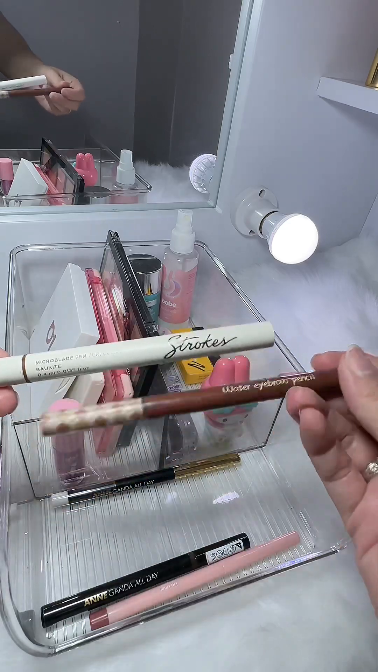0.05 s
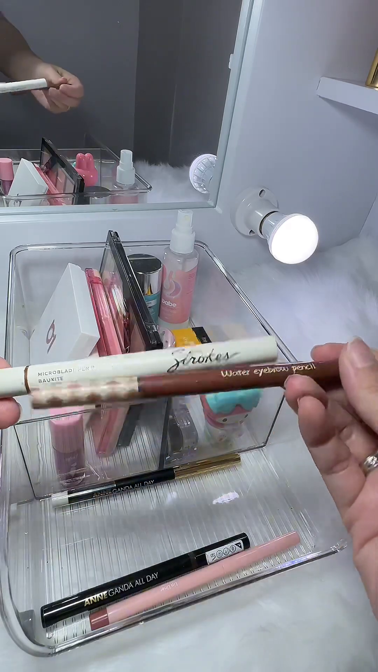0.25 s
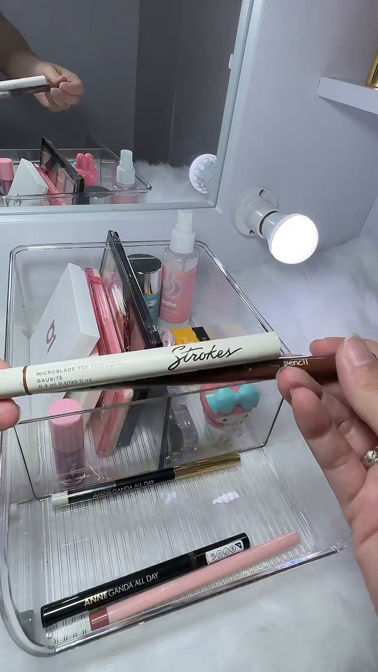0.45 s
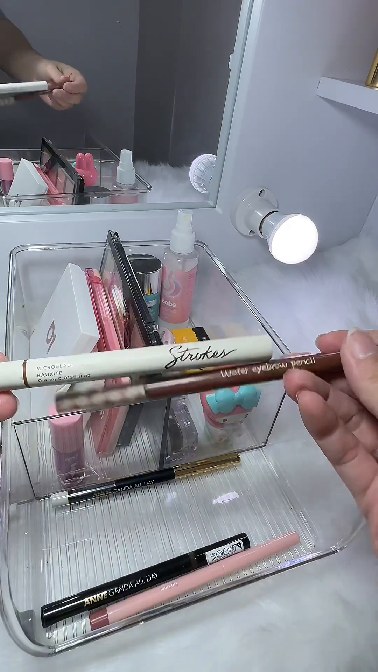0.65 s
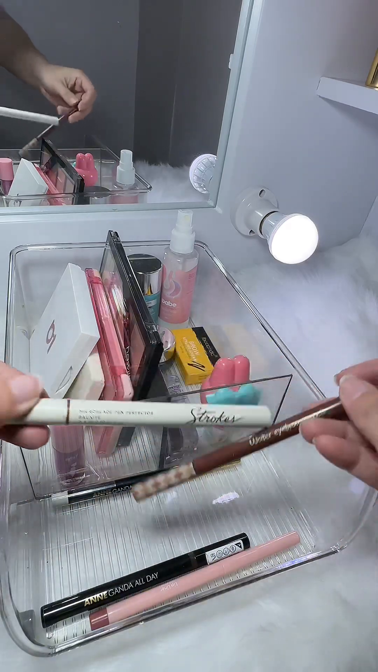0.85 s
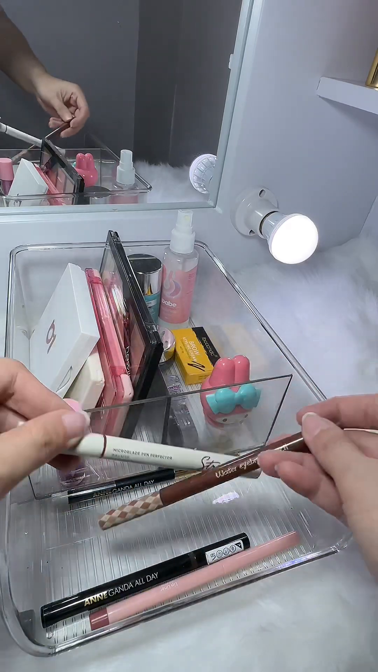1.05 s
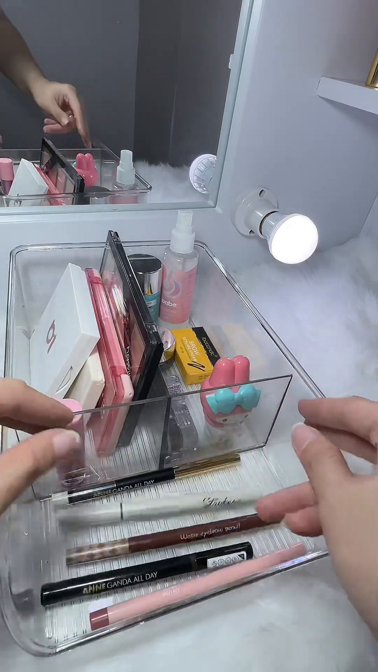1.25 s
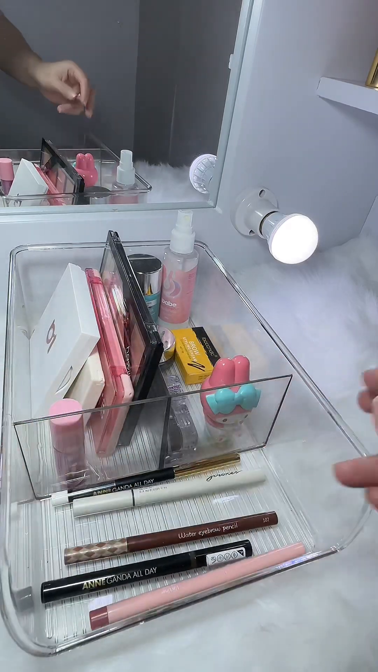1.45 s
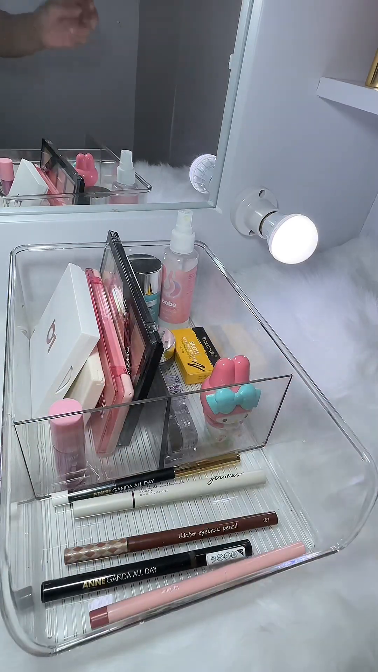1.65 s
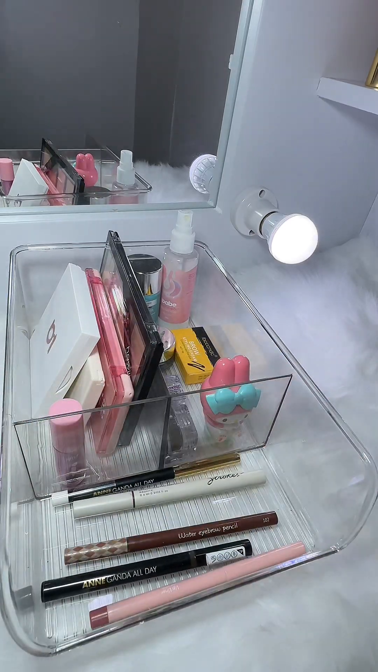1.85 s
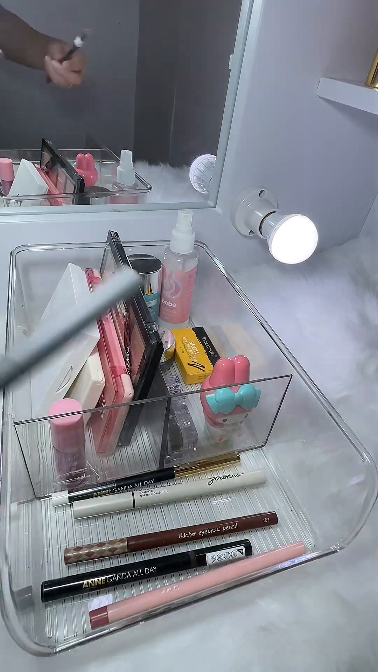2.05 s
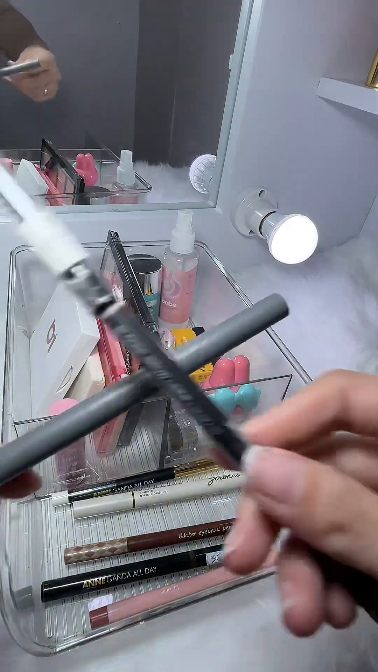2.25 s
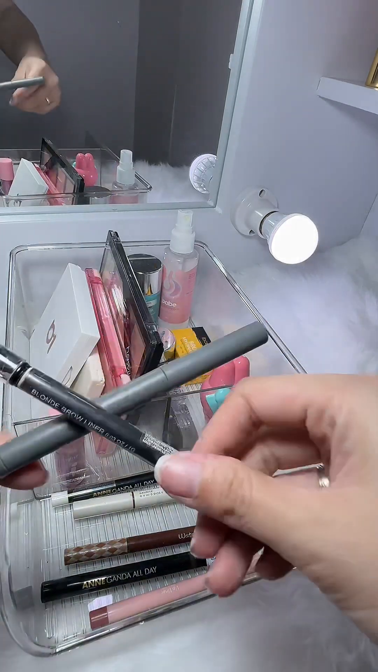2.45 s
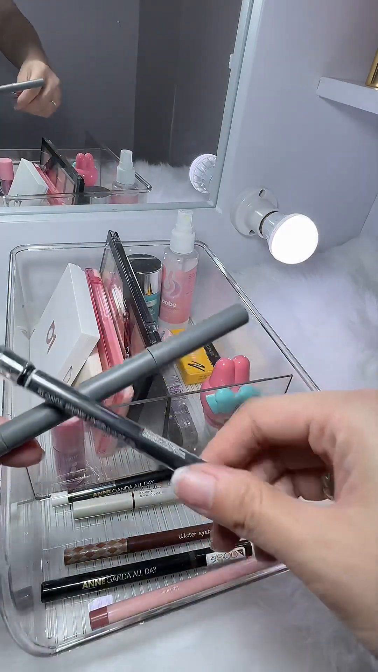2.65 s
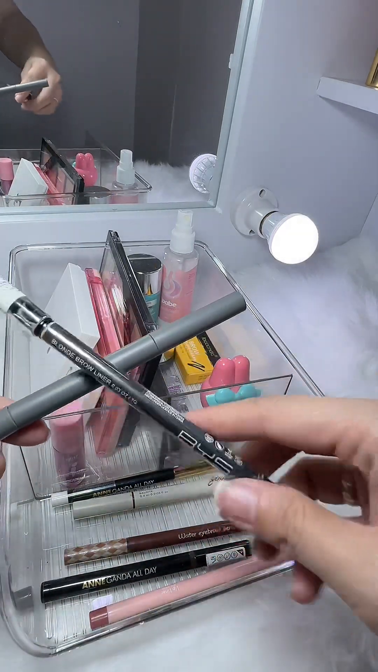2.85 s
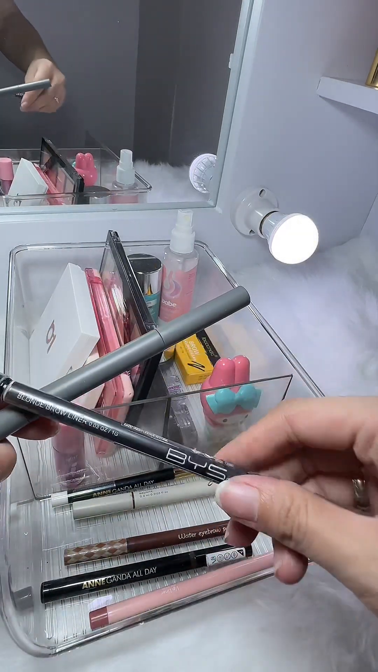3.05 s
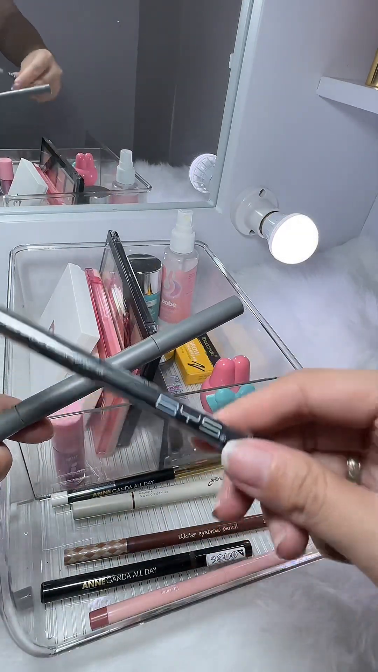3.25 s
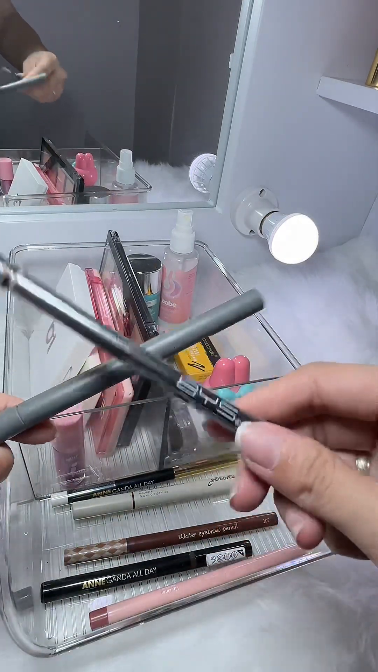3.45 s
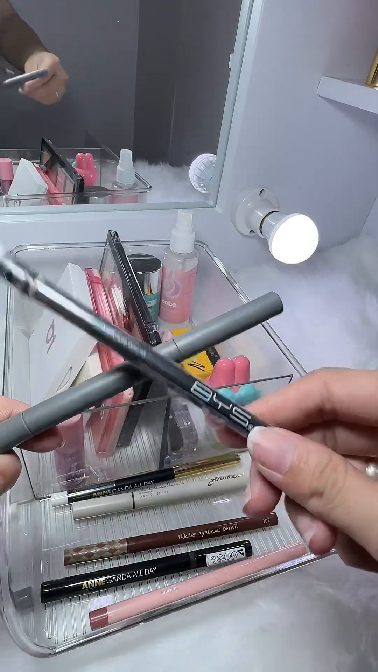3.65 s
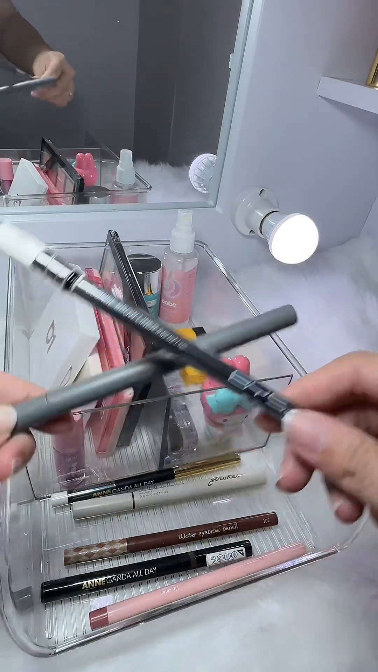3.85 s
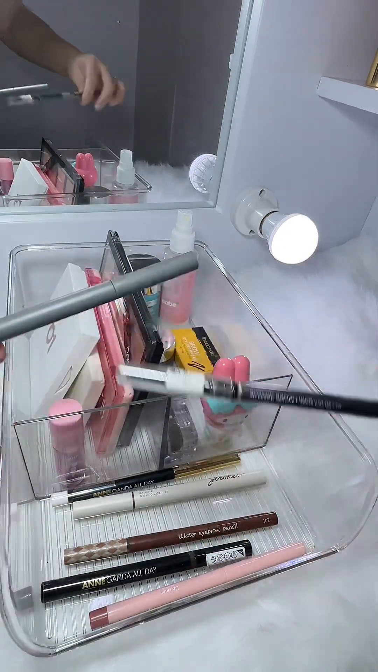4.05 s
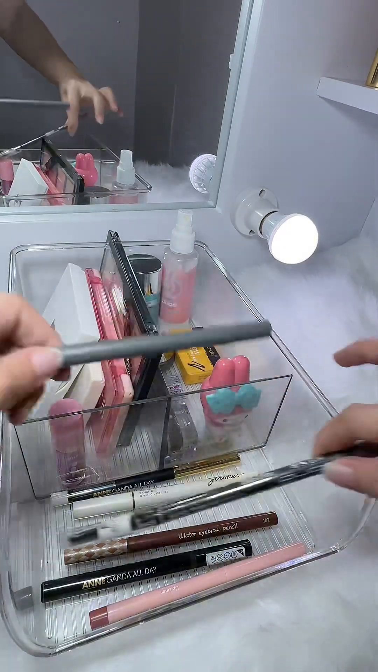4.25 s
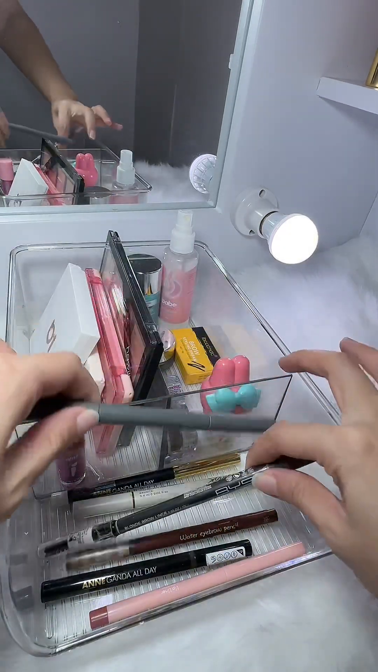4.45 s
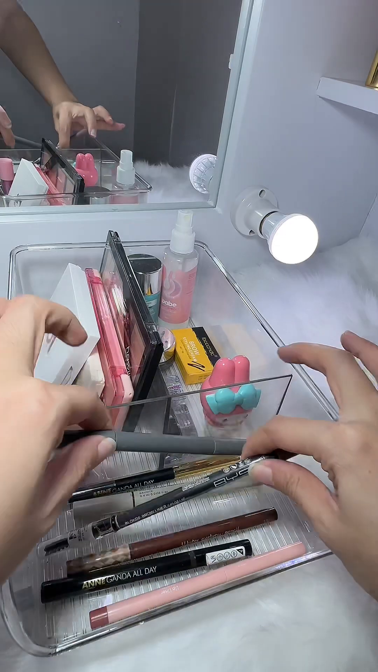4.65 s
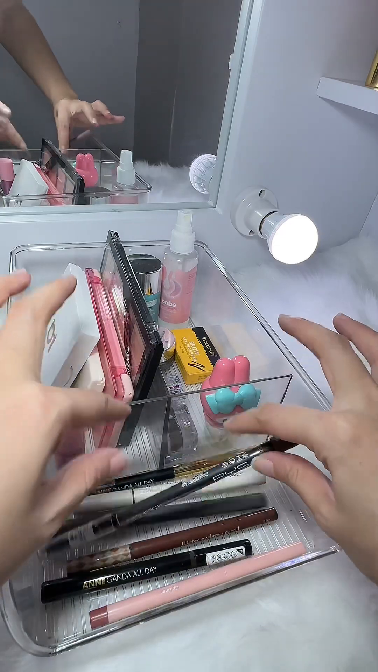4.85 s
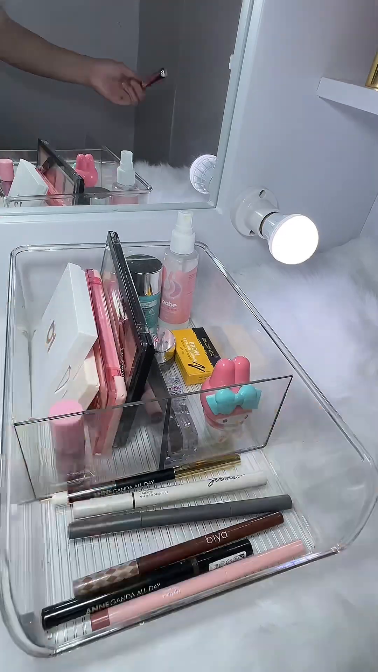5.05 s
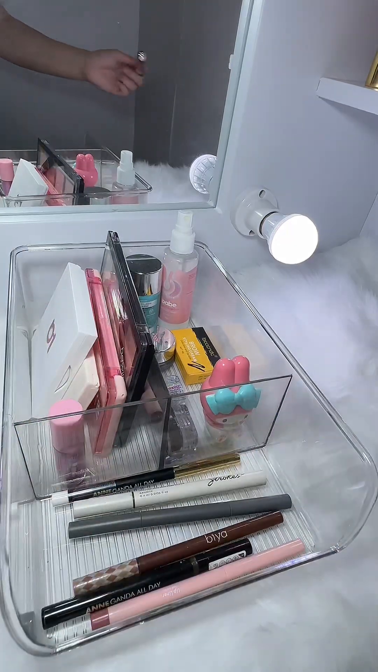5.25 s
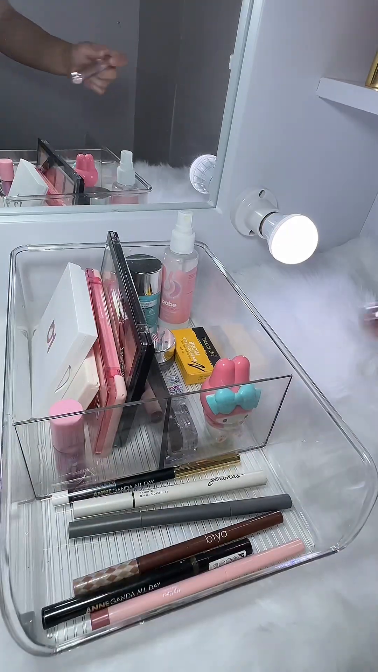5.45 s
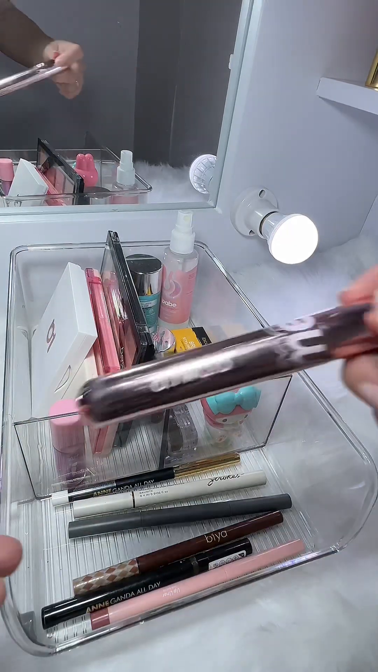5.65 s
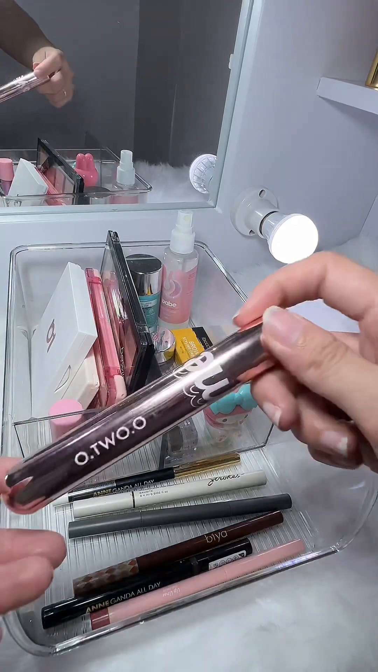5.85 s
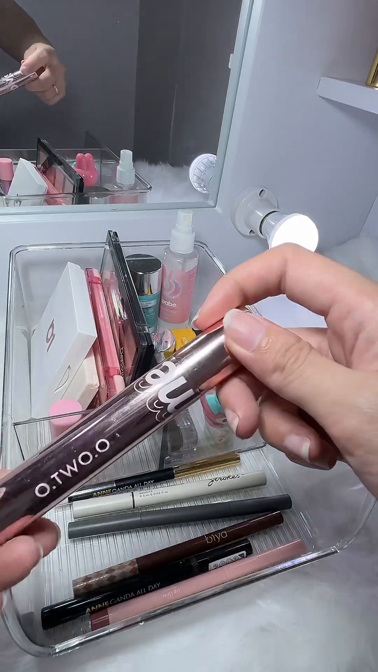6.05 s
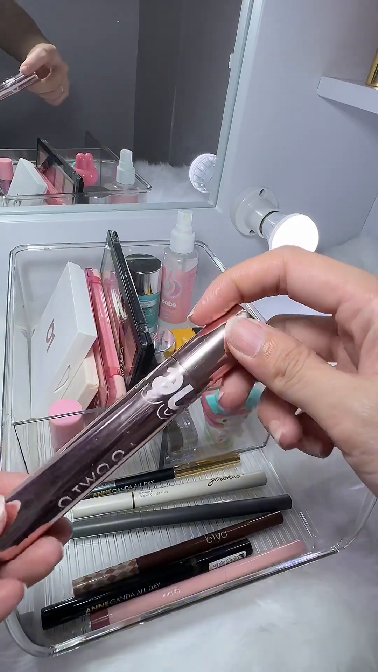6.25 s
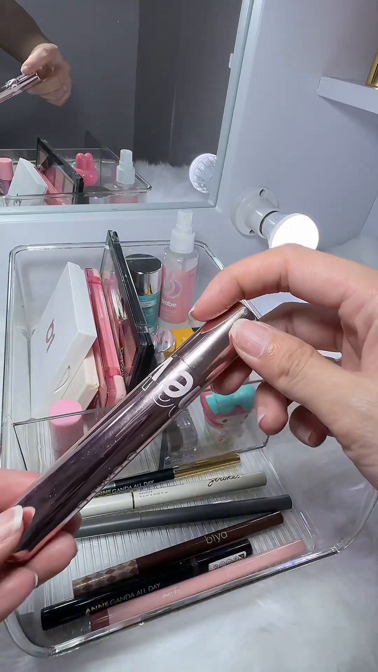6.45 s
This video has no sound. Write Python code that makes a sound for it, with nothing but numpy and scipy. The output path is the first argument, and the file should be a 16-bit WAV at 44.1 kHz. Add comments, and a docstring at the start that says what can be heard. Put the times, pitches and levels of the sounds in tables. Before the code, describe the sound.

Close view of a table in a small quiet room with a very faint appliance hum. Held cosmetic pencils give a few thin, bright ticks, then two drop into a hard plastic tray with a loud, dense clatter and a low knock. After a pause, pencils tick sharply in the hands again, then are laid down with a dull clack, faint taps and a shorter, quieter rattle that stops abruptly. Only faint hum follows.

```python
"""Pencils clatter and rattle on a clear plastic tray, with thin bright ticks as held ones touch, over a faint hum.
The place is a table in a small room: cosmetic pencils are shown by hand and laid into an organizer.
Each landing sums ringing modes of tray and barrel with a burst of bright noise; heavy ones add low thumps.
Held pencils give short noise ticks with a trace of barrel; handling is narrow bands of noise.
An appliance gives wavering sines over soft air noise; landings and ticks get a short dense room tail."""
import sys
import numpy as np
from scipy import signal
from scipy.fft import rfft, irfft
from scipy.io import wavfile
from scipy.ndimage import uniform_filter1d, minimum_filter1d

SR = 44100
rng = np.random.default_rng(int(sys.argv[2]) if len(sys.argv) > 2 else 0)


def wav_record(signal):
    """Record a signal, one row per channel, as 16-bit PCM in the file named by sys.argv[1]."""
    frames = np.transpose(np.atleast_2d(signal))
    bounded = np.clip(frames, -1, 1)
    # unit amplitude maps onto the largest positive 16-bit level
    quanta = np.round(bounded * 32767).astype(np.int16)
    wavfile.write(sys.argv[1], SR, quanta)


N = 287135

# hum lines of the appliance: (frequency [Hz], rms level before a common 1 dB lift and the waver [dB])
HUM_LINES = [(59.2, -79.5), (118.4, -78), (172.3, -75), (231.5, -78.5), (285.3, -84.5), (344.5, -85),
             (608.3, -90), (1696, -93)]
# colour of the rush of air in the room: (frequency [Hz], relative density [dB per Hz])
AIR_COLOUR = [(25, -9.5), (55, -1.5), (90, -7.5), (170, -5.5), (260, -10.5), (400, -8), (550, -15.5),
              (780, -13), (1200, -20.5), (1800, -23), (2700, -32.5), (7000, -38.5), (14500, -38),
              (16000, -43.5)]
# colour of the room's echoes: (frequency [Hz], relative level [dB])
ECHO_COLOUR = [(100, -8), (250, -0.5), (700, 4.5), (1500, -5), (3000, 0), (8000, -1), (16000, -0.5)]
# decay of the room, band by band: (band centre [Hz], t60 [s])
ROOM_DECAY = [(200, .22), (700, .2), (1500, .21), (3000, .235), (8000, .195), (15000, .18)]
# dull bumps of handling: (time of the middle [s], level at the middle [dB])
HAND_BUMPS = [(.76, -65), (2.76, -70), (5.3, -65), (6.28, -65)]
# faint squeaks of handling: (time of the middle [s], level at the middle [dB], pitch [Hz])
HAND_SQUEAKS = [(2.45, -73, 845), (2.79, -75, 571), (2.96, -76, 602), (5.78, -74, 610), (6.07, -78, 630)]
# pencils touch in the hands: (time [s], strength [dB], centre of the tick [Hz], centre of the barrel clack [Hz])
HELD_TICKS = [(0.091, -56.5, 8800, 4100), (0.2061, -29.5, 6800, 4600), (0.22, -40, 14000, 2900),
              (0.344, -47.5, 14000, 2600), (0.3566, -42.5, 11300, 2900), (0.5268, -42.5, 14500, 4600),
              (0.5358, -46, 13500, 4700), (0.64, -55, 14500, 2100), (0.8804, -58, 10700, 2900),
              (2.4018, -38.5, 9050, 2600), (3.0025, -46.5, 13800, 4300), (3.4445, -24.5, 9390, 4800),
              (3.6297, -20.5, 8770, 2830), (3.7771, -28, 14500, 4090)]
# colour of a tick, before the focus on its own centre: (frequency [Hz], relative density [dB per Hz])
TICK_COLOUR = [(600, -43), (1500, -12), (2100, -20), (2800, -5), (3600, -12.5), (5000, -7.5), (7000, -4),
               (8800, 1.5), (11000, -2), (14500, 4), (16500, -1)]
# modes of a pencil barrel: (frequency [Hz], relative level [dB], t60 before scaling by freedom [s])
BARREL_MODES = [(1950, -1.5, .025), (2263, -1.5, 0.036), (2508, 0, 0.031), (2673, 2.5, 0.022),
                (2900, 0, 0.014), (3300, -2, 0.027), (3664, 1, .02), (4000, -8.5, 0.057),
                (4430, -10, 0.065), (4850, -8, .02)]
# modes of the tray: (frequency [Hz], relative level [dB], t60 before scaling by freedom [s])
TRAY_MODES = [(470, -14, 0.013), (529.1, -8.5, 0.12), (575.4, -10.5, 0.07), (658, -4.5, .08), (743, 1, .08),
              (802, -8.5, .06), (863, -9.5, 0.065), (922, -9, 0.074), (1080, -5.5, .06), (1168, -5, 0.042),
              (1250, -6.5, 0.061), (1364, -2.5, 0.032), (1490, 3.5, .06), (1577, -1.5, .05),
              (1730, -11, 0.04)]
# colour of the edge crack, before the hardness tilt: (frequency [Hz], relative density [dB per Hz])
CRACK_COLOUR = [(800, -23.5), (2000, -3), (4000, -3), (5500, -1.5), (7000, 1), (9000, 1), (11000, 0),
                (14500, 1), (16500, -3)]
# a pencil lands on the tray: (time [s], strength [dB], centre of the ring [Hz],
# hardness of the contact [dB], where 0 is a bare edge and -30 is eased down)
LANDINGS = [(1.2374, -24, 1330, -1), (1.2532, -10.5, 1000, -9.5), (1.2635, -10.5, 890, -17),
            (1.2815, -18, 920, -2.5), (1.292, -17.5, 1100, -27), (1.2967, -27, 1120, 3),
            (1.3095, -27, 884, -5), (1.3354, -9.5, 1320, -3), (1.339, -8.5, 1130, -16),
            (1.3475, -15.5, 721.8, -25), (1.3745, -24.5, 724.6, -12.5), (1.382, -19.5, 1080, -11.5),
            (4.417, -19, 1300, -30.5), (4.4255, -27, 1430, -42), (4.536, -40.5, 1500, -32),
            (4.549, -37, 1140, -25.5), (4.5535, -30.5, 1257, -23), (4.574, -39, 976, -12.5),
            (4.597, -42, 1210, -19.5), (4.886, -43, 898, 5), (4.9006, -20, 1400, -5),
            (4.931, -25.5, 1500, -16.5), (4.9445, -29, 1350, 1), (4.9481, -21, 1330, -3),
            (4.9555, -16.5, 781, -13), (4.975, -25.5, 773, -25), (5.002, -21.5, 1180, -20)]
# heavy landings shake the tray floor and the table: (time [s], level [dB], pitch [Hz], t60 [s])
TABLE_THUMPS = [(1.256, -32, 234, .12), (1.257, -19.5, 550.5, 0.095), (1.282, -32.5, 222, .1),
                (1.337, -37, 195, .05), (4.418, -56, 221, 0.099)]

AGE = np.arange(int(.4 * SR)) / SR  # time since the start of one short sound, s
AIR_DB = -72.5
FIRST_ECHO_S, TAIL_END_S = .003, .17
BUMP_S, BUMP_HZ, BUMP_OCTAVES = .11, 60, .27  # length, pitch, width
SQUEAK_S, SQUEAK_OCTAVES = .12, .063  # length, width
TICK_DB, TICK_T60_S = -13.5, .022  # level of the noise tick at strength 0 dB; its life
TICK_FOCUS_LIMIT_DB = 8.5  # most that a tick loses far from its centre
HELD_CLACK_DB, HELD_CLACK_GROWTH = -45, .74  # barrel at tick strength 0 dB; dB it gains per dB of strength
TRAY_DB, TRAY_CUT_HZ = -2, 480  # tray within a contact; low cut of the whole contact
CLACK_DB, CLACK_PER_HARDNESS = -8.5, .39  # barrel at a bare edge; dB it gains per dB of hardness
CLACK_HZ, CLACK_OCTAVES_PER_DB = 3150, .07  # centre at a bare edge; a softer contact lowers it
CRACK_DB, CRACK_PER_HARDNESS = -1, .93  # crack at a bare edge; dB it gains per dB of hardness
CRACK_TILT = .12  # dB per octave that the crack's treble loses for each dB of softer contact
TRAY_FREEDOM, BARREL_FREEDOM = .78, .95  # ring time as a share of the table's t60
CRACK_T60_S = .024
FAR_END_S, FAR_END_DB, FAR_END_SOFTER_DB = .009, -10, 10.5  # mean delay, level, loss of hardness
STOP_S = 5.08
LIMIT, LIMITER_S, CUTOFF_HZ = .9, .003, 16100


def from_db(db):
    """Decibels to gain."""
    return 10 ** (np.asarray(db) / 20)


def rms_one(x):
    """Scale to rms 1."""
    return x / np.sqrt(np.mean(x ** 2) + 1e-20)


def unit_hit(x):
    """Scale a short sound to the energy of 10 ms at rms 1."""
    return x / np.sqrt(np.sum(x ** 2) / (SR / 100) + 1e-20)


def at_hz(points, hz):
    """Read a table on a log-frequency axis."""
    f, value = np.transpose(points)
    return np.interp(np.log(np.maximum(hz, 1)), np.log(f), value)


def fade(t60):
    """Exponential decay, 60 dB down after t60 seconds."""
    return np.exp(-np.log(1000) * AGE / max(t60, 1e-3))


def noise(spectrum, size):
    """Random noise of a given colour, rms 1."""
    hz = np.fft.rfftfreq(size, 1 / SR)
    shaped = rfft(rng.standard_normal(size)) * from_db(at_hz(spectrum, hz))
    return rms_one(irfft(shaped, size))


def drift(rate):
    """Slow wander between random points of spread 1, rate points per second."""
    knots = rng.standard_normal(int(rate * N / SR) + 2)
    return np.interp(np.arange(N) / SR * rate, np.arange(len(knots)), knots)


def add(track, s, sound):
    """Mix a sound into the track at a time in seconds."""
    start = round(s * SR)
    track[start:start + len(sound)] += sound[:N - start]


def low_cut(x, hz):
    """Small bodies radiate almost no bass."""
    return signal.sosfilt(signal.butter(6, hz, "high", fs=SR, output="sos"), x)


def appliance(waver_db, wander):
    """Hum lines waver in level and phase (wander in radians) over a soft rush of air."""
    t = np.arange(N) / SR
    hum = 0
    for hz, db in HUM_LINES:
        level = from_db(db + waver_db * drift(6.6)) * np.sqrt(2)  # rms to peak
        hum = hum + level * np.sin(2 * np.pi * hz * t + wander * drift(4.3))
    return from_db(1.0) * hum + from_db(AIR_DB) * noise(AIR_COLOUR, size=N)


def room(hit, wet_db):
    """Mirror and close walls return a dense tail, dying band by band, with new echoes for every hit."""
    hz = np.fft.rfftfreq(len(AGE), 1 / SR)
    echoes = rfft(rng.standard_normal(len(AGE))) * from_db(at_hz(ECHO_COLOUR, hz))
    tail = 0
    for centre, t60 in ROOM_DECAY:
        # triangular bands that together add up to 1
        share = at_hz([(f, f == centre) for f, _ in ROOM_DECAY], hz)
        tail = tail + irfft(echoes * share, len(AGE)) * fade(t60)
    # the tail starts with the first echo and sinks ever faster towards its end
    onset = np.clip(AGE / FIRST_ECHO_S - 1, 0, 1)
    tail = tail * onset * np.exp(-(AGE / TAIL_END_S) ** 4)
    tail = tail / np.sqrt(np.sum(tail ** 2))
    return hit + from_db(wet_db) * signal.fftconvolve(hit, tail)[:len(AGE)]


def rub(length, centre_hz, octaves):
    """A narrow band of friction noise that swells and fades."""
    hz = np.fft.rfftfreq(len(AGE), 1 / SR) + 1
    band = np.exp(-.5 * (np.log2(hz / centre_hz) / octaves) ** 2)
    swell = np.cos(np.pi * np.clip((AGE - AGE.mean()) / length, -.5, .5))
    friction = irfft(rfft(rng.standard_normal(len(AGE))) * band)
    return rms_one(friction) * swell


def handling():
    """Hands shift: dull bumps and faint squeaks of friction."""
    out = np.zeros(N)
    for s, db in HAND_BUMPS:
        add(out, s - AGE.mean(), from_db(db) * rub(BUMP_S, BUMP_HZ, BUMP_OCTAVES))
    for s, db, hz in HAND_SQUEAKS:
        add(out, s - AGE.mean(), from_db(db) * rub(SQUEAK_S, hz, SQUEAK_OCTAVES))
    return out


def favour(hz, centre_hz, db_per_octave):
    """A contact drives the frequencies near its own centre best; dB, falling with octaves squared."""
    return -db_per_octave * np.log2(hz / centre_hz) ** 2


def strike(modes, scatter_db, centre_hz, focus_db, freedom):
    """One blow rings every mode, with a random strength and sign that stand for the spot it lands on."""
    out = 0
    for hz, db, t60 in modes:
        strength_db = db + favour(hz, centre_hz, focus_db) + scatter_db * rng.standard_normal()
        ring = np.sin(2 * np.pi * hz * AGE) * fade(t60 * freedom)
        out = out + rng.choice([-1, 1]) * from_db(strength_db) * ring
    return unit_hit(out)


def snap(spectrum, t60, rise_s):
    """The many high modes of hard plastic merge into a burst that dies within milliseconds."""
    rise = 1 - np.exp(-AGE / max(rise_s, 1e-5))
    return unit_hit(noise(spectrum, size=len(AGE)) * fade(t60) * rise)


def ticks():
    """Fingers damp the held pencils, so only a thin bright tick and a trace of the barrel are left."""
    out = np.zeros(N)
    for s, db, tick_hz, clack_hz in HELD_TICKS:
        colour = []
        for hz, level in TICK_COLOUR:
            focus = max(favour(hz, tick_hz, db_per_octave=3.0), -TICK_FOCUS_LIMIT_DB)
            colour.append((hz, level + focus))
        tick = from_db(db + TICK_DB) * snap(colour, TICK_T60_S, rise_s=.0019)
        barrel_gain = from_db(HELD_CLACK_DB + HELD_CLACK_GROWTH * db)
        barrel = barrel_gain * strike(BARREL_MODES, 1.3, clack_hz, focus_db=36, freedom=1.1)
        add(out, s, room(tick + low_cut(barrel, hz=1400), wet_db=-7.0))
    return out


def contact(db, ring_hz, hardness_db):
    """One touch rings the tray; the harder it is, the more the barrel clacks and the brighter the edge cracks."""
    tray = from_db(TRAY_DB) * strike(TRAY_MODES, 2, ring_hz, focus_db=5.5, freedom=TRAY_FREEDOM)
    clack_hz = CLACK_HZ * 2 ** (CLACK_OCTAVES_PER_DB * hardness_db)
    barrel_gain = from_db(CLACK_DB + CLACK_PER_HARDNESS * hardness_db)
    barrel = barrel_gain * strike(BARREL_MODES, 2.5, clack_hz, focus_db=5, freedom=BARREL_FREEDOM)
    colour = [(hz, level + CRACK_TILT * hardness_db * np.log2(hz)) for hz, level in CRACK_COLOUR]
    crack_gain = from_db(CRACK_DB + CRACK_PER_HARDNESS * hardness_db)
    crack = crack_gain * snap(colour, t60=CRACK_T60_S, rise_s=.002)
    return from_db(db) * low_cut(tray + barrel + crack, hz=TRAY_CUT_HZ)


def stop_short():
    """The ring of the last clatter breaks off suddenly, within 2 ms."""
    return np.clip((STOP_S - np.arange(N) / SR) / .002, 0, 1)


def landings():
    """A pencil lands on one end, then weaker and softer on the other; heavy landings thump the table below."""
    out = np.zeros(N)
    for s, db, ring_hz, hardness_db in LANDINGS:
        add(out, s, room(contact(db, ring_hz, hardness_db), wet_db=-11.5))
        far_end = contact(db + FAR_END_DB, ring_hz, hardness_db - FAR_END_SOFTER_DB)
        add(out, s + FAR_END_S * rng.uniform(.8, 1.2), room(far_end, wet_db=-12))
    for s, db, hz, t60 in TABLE_THUMPS:
        # the table takes a moment to get moving
        rise = 1 - np.exp(-AGE * hz / .4)
        thump = np.sin(2 * np.pi * hz * AGE) * fade(t60) * rise
        add(out, s, from_db(db) * unit_hit(low_cut(thump, hz=155)))
    return out


def scene():
    """Hum and handling in the background, ticks in the hands, landings on the tray in front."""
    background = appliance(waver_db=1.57, wander=.35) + handling()
    return (background + ticks() + landings() * stop_short())[None]


def record(dry):
    """Behind the microphone, a fast limiter turns down peaks over LIMIT and a steep filter cuts the top."""
    span = int(LIMITER_S * SR)
    gain = minimum_filter1d(LIMIT / np.maximum(np.abs(dry), LIMIT), size=span)
    limited = dry * uniform_filter1d(gain, size=span)
    top_cut = signal.ellip(10, .2, 80, CUTOFF_HZ, fs=SR, output="sos")
    return signal.sosfilt(top_cut, limited)


dry = scene()
out = record(dry)
wav_record(out)
```